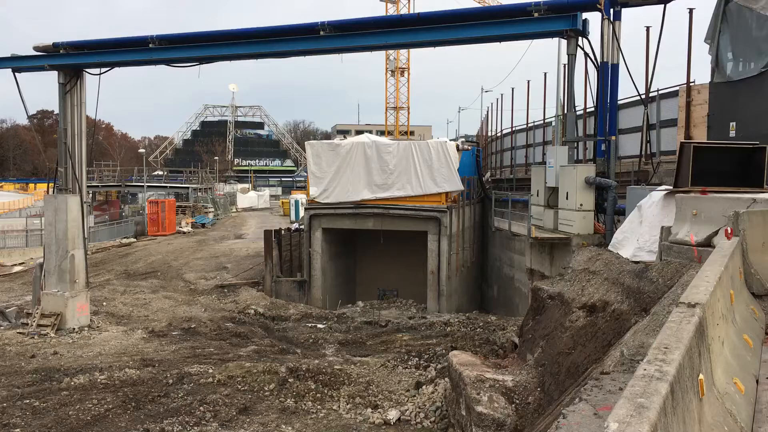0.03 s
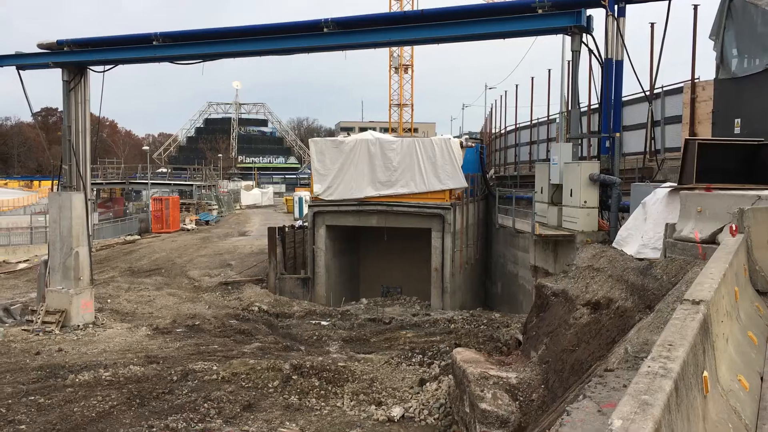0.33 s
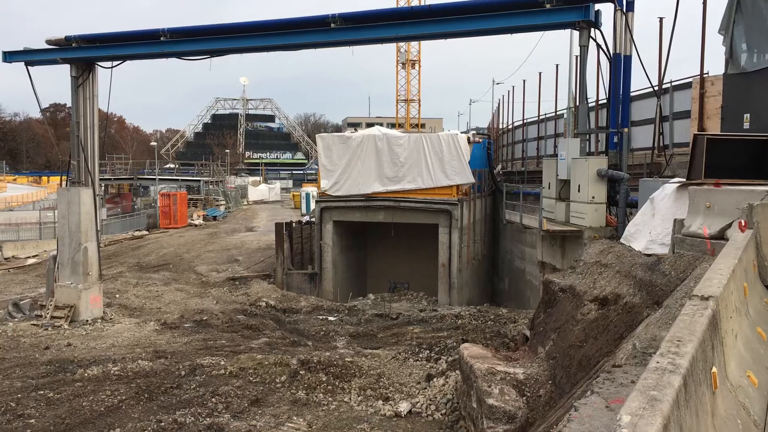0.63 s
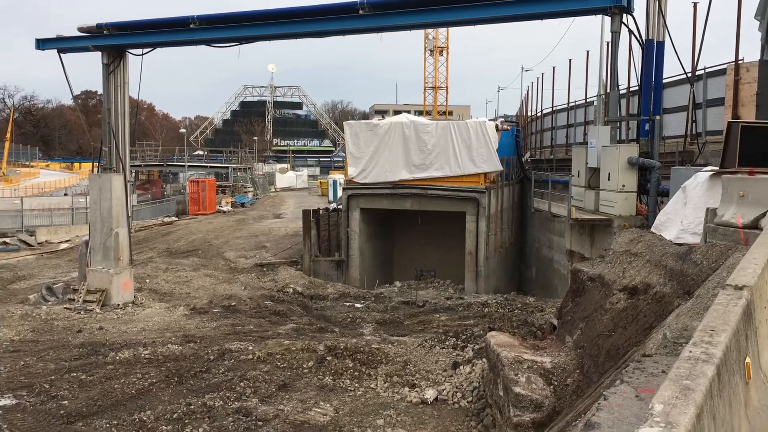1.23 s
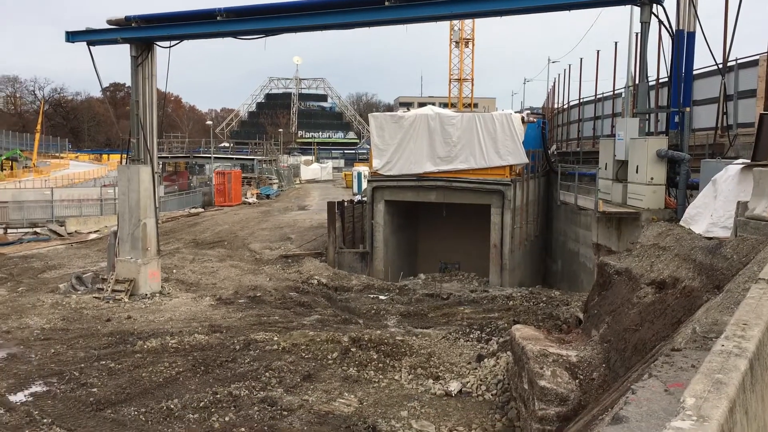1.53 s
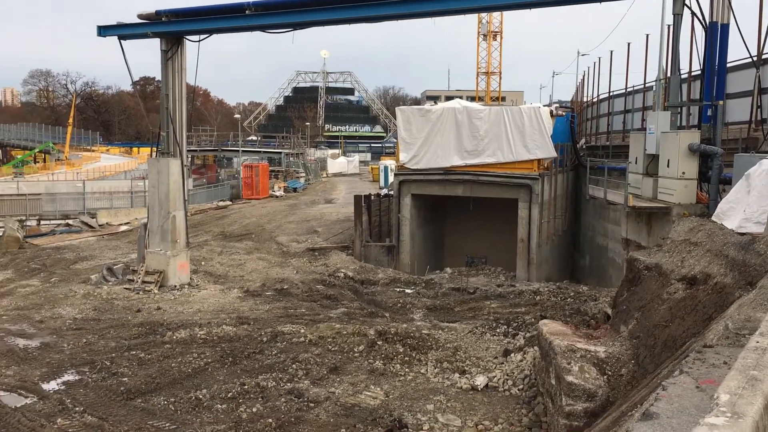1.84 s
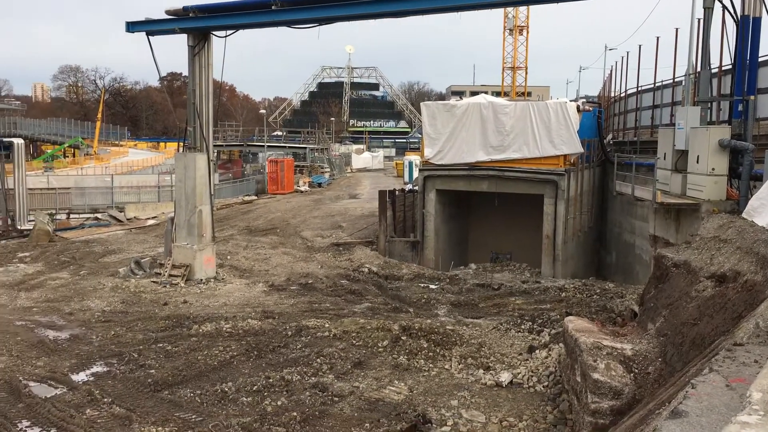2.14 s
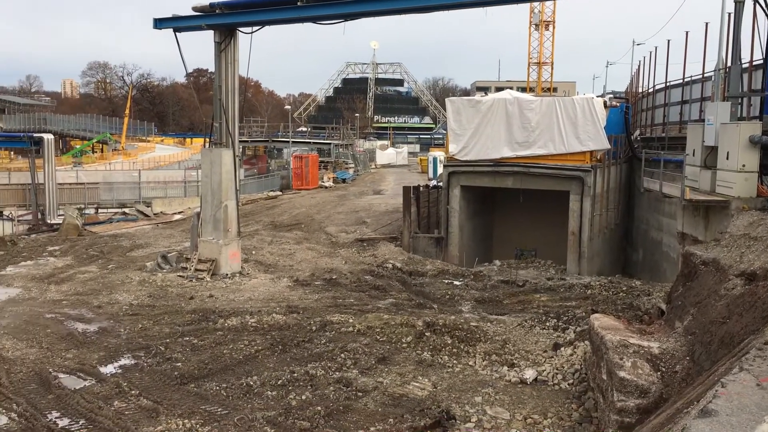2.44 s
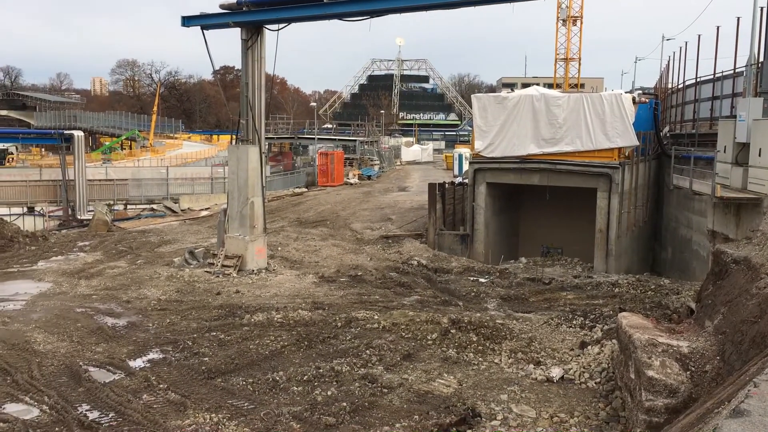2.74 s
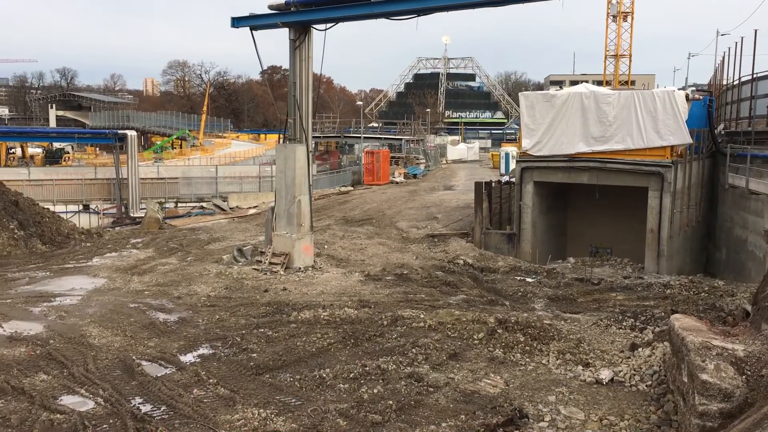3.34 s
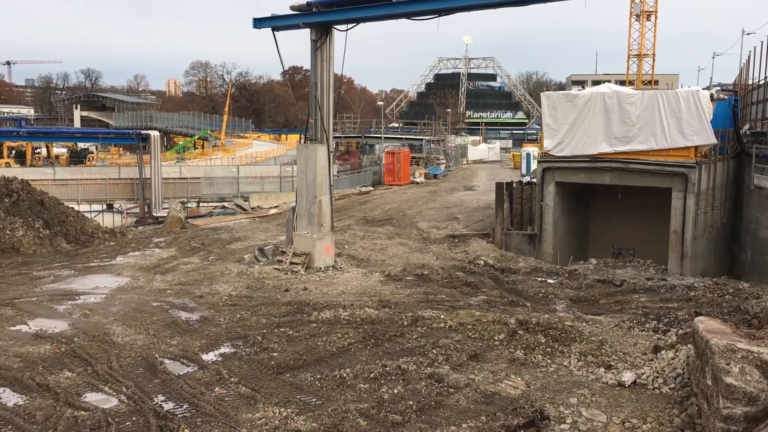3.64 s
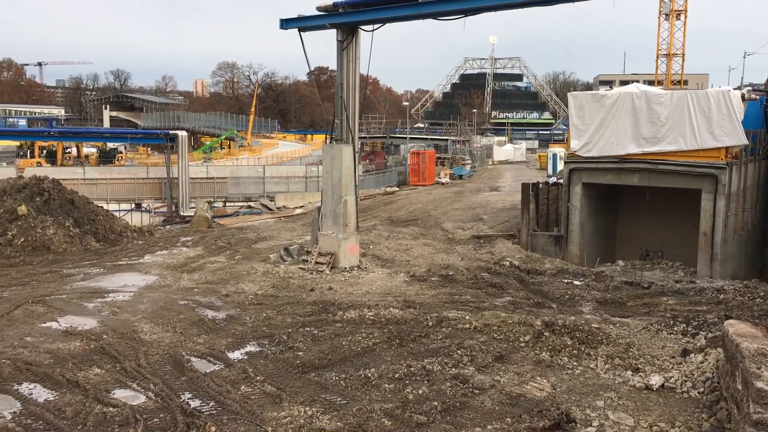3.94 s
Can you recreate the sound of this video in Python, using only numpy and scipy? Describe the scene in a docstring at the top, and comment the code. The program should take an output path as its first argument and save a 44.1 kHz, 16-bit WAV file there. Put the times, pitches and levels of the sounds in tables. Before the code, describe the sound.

A distant diesel engine drones on a building site, sagging in pitch and fading by 2.5 seconds into a steady rumble of machinery and traffic with a faint motor hum. A far machine rasps faintly five times in the first two seconds. At 2.2 seconds steel clanks once in the distance, with a short echo and soft dull knocks. Close by, grit crunches faintly now and then until 4 seconds.

```python
"""A wide, muddy building site. A far diesel engine drones, sags under load and fades into the rumble of plant and traffic.
A motor hums, a distant machine rasps five times, and one steel clank echoes off the concrete.
Close by, grit crunches faintly underfoot."""
import sys
import numpy as np
from scipy import signal
from scipy.fft import rfft, irfft, next_fast_len
from scipy.io import wavfile
from scipy.ndimage import uniform_filter1d, map_coordinates

SR = 44100
rng = np.random.default_rng(int(sys.argv[2]) if len(sys.argv) > 2 else 0)


def unload_wav(signal):
    """Save mono or channel-first audio to the path in sys.argv[1] as 16-bit WAV at rate SR, clipped to [-1, 1]."""
    wavfile.write(
        sys.argv[1],
        SR,
        np.round(np.clip(np.atleast_2d(signal).T, -1, 1) * 32767).astype(np.int16),
    )


N = 176400

# diesel exhaust: (s, firing rate Hz, level dB)
ENGINE = [(.08, 60.5, -40), (.27, 60.5, -41.5), (.44, 64.03, -36.5), (.55, 62.3, -40), (.65, 55.8, -28.5), (.72, 54.3, -35), (.84, 54.25, -37.5), (.92, 53.05, -33),
          (1.04, 51.4, -35), (1.2, 50.25, -32.5), (1.35, 51.57, -29.5), (1.5, 53.96, -33), (1.65, 54.83, -38), (1.8, 53.9, -34.5), (2.02, 52.93, -49.5), (2.27, 49.1, -34.5), (2.5, 46.05, -52.5), (4, 42.3, -44)]
OVERTONES = [(2, -18), (3, -30.5)]  # (multiple of the firing rate, dB)
ENGINE_DB, ENGINE_JITTER, ENGINE_FLUTTER_DB = -1.5, 0.01, 0.34
# plant and traffic, low part: (Hz, dB per Hz) and (s, level dB)
RUMBLE = [(20, -23), (30, -11.5), (40, 1.5), (52, 0), (65, -2), (80, -5), (100, -8), (125, -12.5), (170, -18), (270, -16), (450, -30.5), (900, -63.5)]
RUMBLE_LEVEL = [(0, -42.5), (.7, -42.5), (1.7, -42), (2.3, -43.5), (2.7, -43.5), (4, -43)]
# the wash of the town: (Hz, dB per Hz) and (s, level dB)
WASH = [(100, -21), (300, 1.5), (500, -1), (750, 0.5), (1000, 2), (1400, 0.5), (1800, -5), (2200, -7), (2700, -13), (3400, -15), (4300, -21), (4900, -27.5), (5600, -28.5), (7500, -37), (9500, -37), (10400, -53), (11500, -39.5), (15000, -53)]
WASH_LEVEL = [(0, -51.5), (1.2, -51.5), (2.3, -51), (3, -52.5), (3.7, -53), (4, -50.5)]
HUM_HZ, HUM_DB, HUM_DRIFT, HUM_FLUTTER_DB = 196, -57.5, 0.008, 2
# strokes of the rasping machine: (middle s, half length s, level dB, treble dB)
RASPS = [(0.148, 0.11, -56.5, -0.5), (0.6, 0.073, -56.5, -1.5), (0.977, 0.052, -55, -4), (1.387, 0.079, -55, -12), (1.826, 0.04, -51.5, -14)]
RASP_BODY = [(910, 59, -4), (1236, 44, -1.5), (1560, 41, -4), (1870, 91, -13), (2190, 62, -8.5), (2480, 94, -13.5)]  # (Hz, width Hz, dB)
RASP_TREBLE = [(2500, 120, -5), (2820, 97, 0.5), (3150, 260, -4.5), (3460, 160, -6)]  # (Hz, width Hz, dB)
RASP_BODY_DB, RASP_TREBLE_DB = -3, -7.5
WHINE_HZ, WHINE_DB, WHINE_DRIFT, WHINE_BLUR = 312.6, -2, 0.00203, .5  # blur: phase scatter in radians
WHINE_BODY = [(3, -11), (4, 1), (5, -4.5), (6, -14), (7, -12.5), (8, -14)]  # (multiple of the pitch, dB)
WHINE_TREBLE = [(9, -4.5), (10, -16), (11, -17)]  # (multiple of the pitch, dB)
# steel struck far away: (s, level dB, centre of the modes it excites Hz)
CLANKS = [(2.206, -49.5, 3500), (2.212, -40.5, 2040)]
STEEL = [(1390, -4, .2), (1550, -5, .15), (1906, -2, 0.15), (2100, -8, .1), (2334, -3.5, 0.11), (2390, -7, .12), (2950, -7, .08), (3260, -3.5, .08), (3410, 0, .09), (3600, -6, .07), (3900, -5, .07), (4200, -13, .06)]  # (Hz, dB, t60 s)
CLANK_ATTACK_S, CLANK_BLUR = 0.0033, 0.51  # blur: phase scatter in radians
CLANK_FALLOFF_DB = 30  # how much weaker a mode rings an octave from the centre
CRASH_DB, CRASH_T60_S, CRASH_OCTAVES = -2.5, 0.09, .3
ECHO_DB, ECHO_DELAY_S, ECHO_RISE_S, ECHO_T60_S, ECHO_WIDTH_HZ = -7, 0.02, 0.017, 0.45, 200
# dull knocks after the clank: (s, level dB)
KNOCKS = [(2.228, -47), (2.3, -48), (2.402, -55)]
KNOCK_HZ, KNOCK_OCTAVES, KNOCK_RISE_S, KNOCK_T60_S = 515, 0.25, 0.0064, 0.21
# crunches of grit: (s, level dB, t60 s, centre Hz)
CRUNCHES = [(.329, -54.5, 0.18, 3700), (.76, -61, 0.081, 5500), (1.1, -60.5, 0.14, 5540), (1.241, -59.5, 0.21, 4970), (1.826, -59, 0.094, 8800), (1.846, -56, 0.12, 5450),
            (2.658, -61, 0.08, 5500), (3.35, -70.5, 0.27, 6000), (3.95, -68, 0.18, 5460)]
CRUNCH_RISE_S, GRIT_OCTAVES, GRAINS_PER_S = 0.0091, 0.46, 3500
# single stones clicking: (s, peak dB, Hz)
TICKS = [(0.2963, -58.5, 6200), (0.4804, -53, 5900), (1.1094, -53, 5800), (1.13, -64, 8000), (1.218, -56, 3900), (1.2445, -60, 6500), (1.6494, -65, 7560), (1.83, -53, 8900), (1.85, -58, 9500), (2.0376, -66, 7450), (3.105, -61, 6004)]
TICK_T60_S, TICK_OCTAVES = 0.0076, 0.18
LOOSE_GRIT_DB, LOOSE_PER_S, LOOSE_HZ = -92.5, 50, 6000
START_S = .072  # fixed
TOP_HZ = 15500  # fixed


def amp(db):
    """Decibels to gain."""
    return 10 ** (np.asarray(db) / 20)


def unit(x):
    """Scale to rms 1."""
    return x / np.sqrt(np.mean(x ** 2) + 1e-20)


def clock():
    """Seconds at every sample."""
    return np.arange(N) / SR


def curves(rows):
    """One value per sample for each column after the time."""
    s, *cols = np.transpose(rows)
    return [np.interp(clock(), s, c) for c in cols]


def wobble(rate):
    """A smooth random curve, rate knots a second."""
    return map_coordinates(rng.standard_normal(1024), [clock() * rate + 2], mode="wrap")


def filtered(x, response):
    """x times a response of frequency."""
    m = next_fast_len(N + 8192)
    return irfft(rfft(x, m) * response(np.fft.rfftfreq(m, 1 / SR)), m)[:N]


def rush(spectrum, patchy_db):
    """Noise of rms 1 with a given colour and patches of random gain."""
    z = signal.stft(rng.standard_normal(N), nperseg=512)[2]
    field = uniform_filter1d(uniform_filter1d(rng.standard_normal(z.shape), 6, 0), 14, 1)
    x = signal.istft(z * amp(patchy_db * unit(field)), nperseg=512)[1][:N]
    hz, db = np.transpose(spectrum)
    return unit(filtered(x, lambda f: amp(np.interp(np.log(f + 1), np.log(hz), db)) * f / np.hypot(f, 10)))


def ringing(modes):
    """Noise of rms 1 ringing in (Hz, width, dB) resonances."""
    power = lambda f: sum(np.abs(amp(db) * f * w / (c * c - f * f + 1j * f * w)) ** 2 for c, w, db in modes)
    top = max(c for c, w, db in modes)
    return unit(filtered(rng.standard_normal(N), lambda f: np.sqrt(power(f) / (1 + (f / (1.02 * top)) ** 12))))


def band(x, hz, octaves):
    """A bell-shaped band of x, rms 1."""
    return unit(filtered(x, lambda f: np.exp(-.5 * (np.log2((f + 1) / hz) / octaves) ** 2)))


def burst(start, rise, t60):
    """A quick rise and an exponential fall."""
    t = np.maximum(clock() - start, 0)
    return (1 - np.exp(-t / rise)) * amp(-60 * t / t60)


def grains(rate):
    """Random impulses of random size, rate a second."""
    return (rng.random(N) < rate / SR) * rng.standard_normal(N)


def diesel():
    """The exhaust note of a far engine: almost only its firing rate arrives."""
    hz, db = curves(ENGINE)
    phase = 2 * np.pi * np.cumsum(hz * (1 + ENGINE_JITTER * wobble(14))) / SR
    note = np.sin(phase) + sum(amp(level + 1.3 * wobble(7.03)) * np.sin(round(k) * phase) for k, level in OVERTONES)
    return np.sqrt(2) * note * amp(ENGINE_DB + db + ENGINE_FLUTTER_DB * wobble(16))


def background():
    """Low rumble of plant and traffic under the broad wash of the town."""
    rumble = amp(curves(RUMBLE_LEVEL)[0]) * rush(RUMBLE, patchy_db=0.78)
    wash = amp(curves(WASH_LEVEL)[0] + 0.46 * wobble(12)) * rush(WASH, patchy_db=1.07)
    return rumble + wash


def motor():
    """A steady hum that wavers on its way through the air."""
    phase = 2 * np.pi * np.cumsum(HUM_HZ * (1 + HUM_DRIFT * wobble(9))) / SR
    return np.sqrt(2) * amp(HUM_DB + HUM_FLUTTER_DB * wobble(6)) * np.sin(phase)


def rasping():
    """Each stroke is a buzzing whine on one pitch with scraping noise around it; the later ones are duller."""
    phase = 2 * np.pi * np.cumsum(WHINE_HZ * (1 + WHINE_DRIFT * wobble(12))) / SR
    whine = lambda partials: sum(amp(WHINE_DB + db + 1.5 * wobble(24.9)) * np.sin(round(k) * phase + WHINE_BLUR * wobble(50.2)) for k, db in partials)
    body = whine(WHINE_BODY) + amp(RASP_BODY_DB) * ringing(RASP_BODY)
    treble = whine(WHINE_TREBLE) + amp(RASP_TREBLE_DB) * ringing(RASP_TREBLE)
    return sum(amp(db) * np.exp(-np.abs((clock() - s) / half) ** 3) * (body + amp(treble_db) * treble)
               for s, half, db, treble_db in RASPS)


def clank():
    """A double contact of steel: each rings the modes near its own pitch, and the walls smear them into an echo."""
    out = np.zeros(N)
    for s, db, centre in CLANKS:
        modes = [(hz, level - CLANK_FALLOFF_DB * np.log2(hz / centre) ** 2, t60) for hz, level, t60 in STEEL]
        ring = sum(amp(level) * burst(s, CLANK_ATTACK_S, t60) * np.sin(2 * np.pi * hz * clock() + CLANK_BLUR * wobble(120)) for hz, level, t60 in modes)
        crash = amp(CRASH_DB) * burst(s, CLANK_ATTACK_S, CRASH_T60_S) * band(rng.standard_normal(N), centre, CRASH_OCTAVES)
        echo = amp(ECHO_DB) * burst(s + ECHO_DELAY_S, ECHO_RISE_S, ECHO_T60_S) * ringing([(hz, ECHO_WIDTH_HZ, level) for hz, level, t60 in modes])
        out += amp(db) * (ring + crash + echo)
    return out


def grit():
    """Short crunches, single stones and a sparse scatter of loose grains."""
    out = amp(LOOSE_GRIT_DB) * band(grains(LOOSE_PER_S), LOOSE_HZ, GRIT_OCTAVES)
    for s, db, t60, hz in CRUNCHES:
        out += amp(db) * burst(s, CRUNCH_RISE_S, t60) * band(grains(GRAINS_PER_S), hz, GRIT_OCTAVES)
    for s, db, hz in TICKS:
        tick = burst(s, .0002, TICK_T60_S) * band(rng.standard_normal(N), hz, TICK_OCTAVES)
        out += amp(db) * tick / np.abs(tick).max()
    return out


def knocks():
    """Soft, dull knocks as the struck piece settles."""
    return band(rng.standard_normal(N), KNOCK_HZ, KNOCK_OCTAVES) * sum(amp(db) * burst(s, KNOCK_RISE_S, KNOCK_T60_S) for s, db in KNOCKS)


def scene():
    """Everything heard from one spot on the site."""
    return (diesel() + background() + motor() + rasping() + clank() + knocks() + grit())[None]


def record(dry):
    """The sound begins after an instant of silence and has nothing above the band limit."""
    return filtered(dry[0] * (clock() > START_S), lambda f: f < TOP_HZ)[None]


dry = scene()
out = record(dry)
unload_wav(out)
```